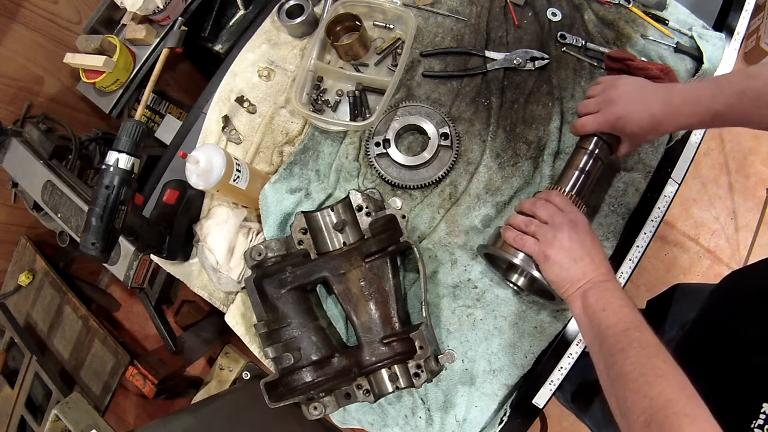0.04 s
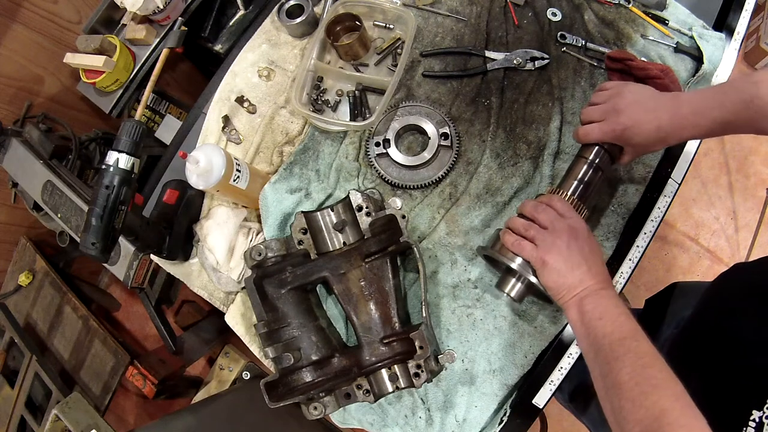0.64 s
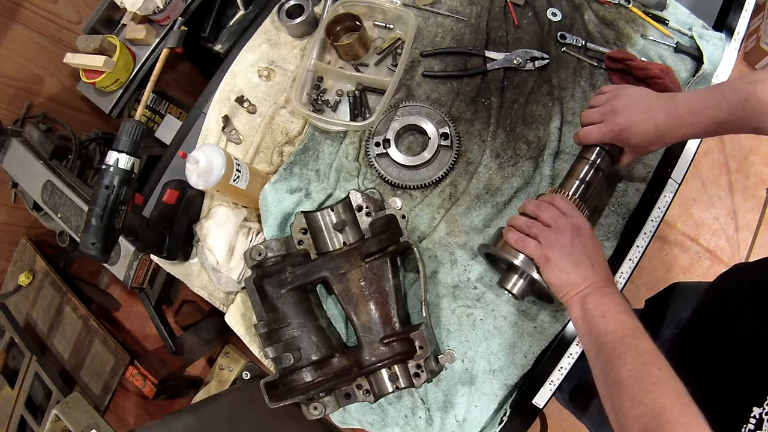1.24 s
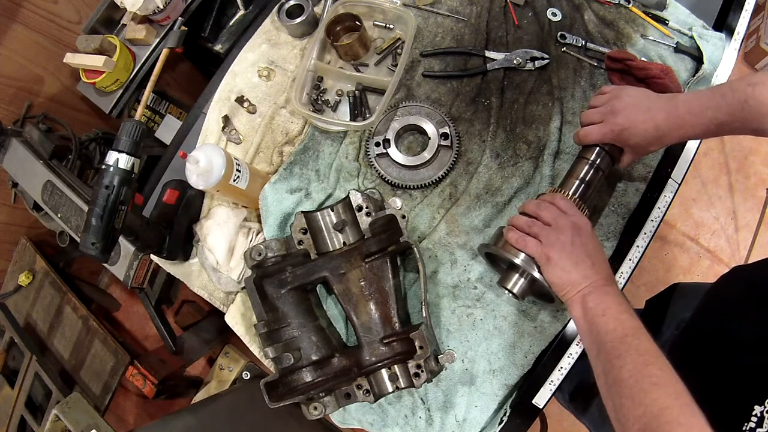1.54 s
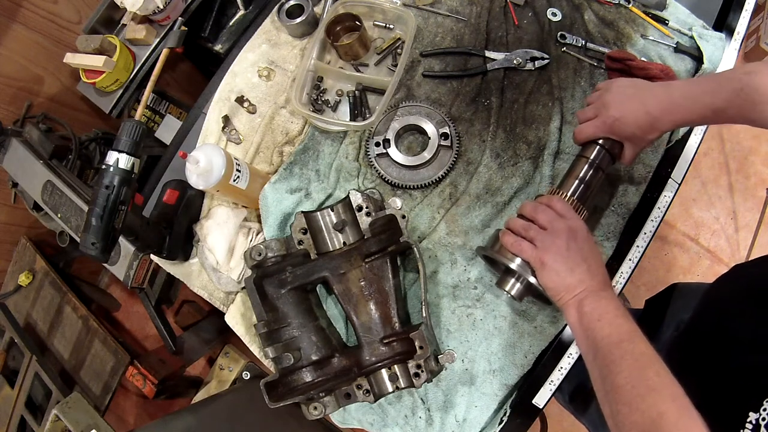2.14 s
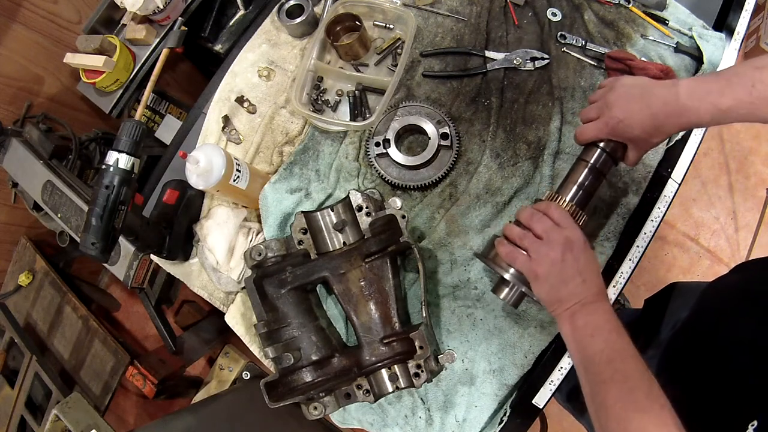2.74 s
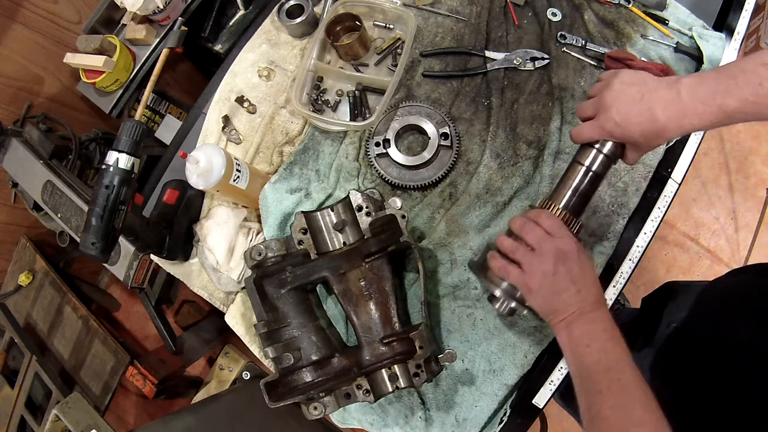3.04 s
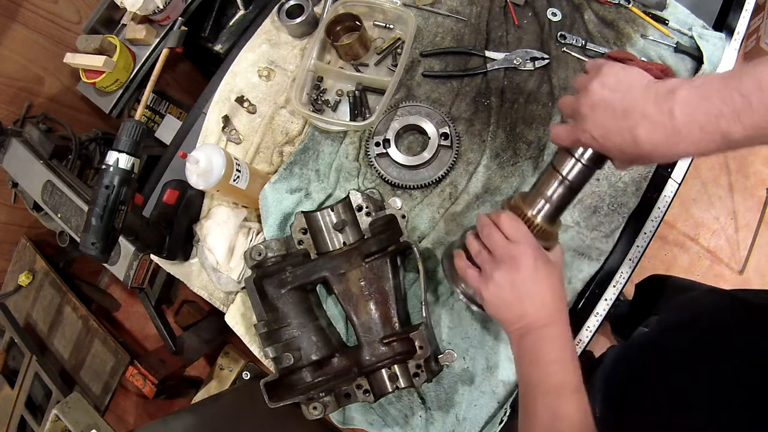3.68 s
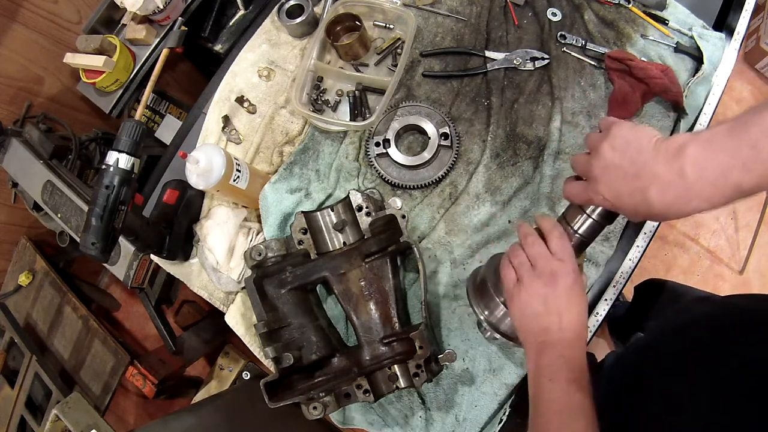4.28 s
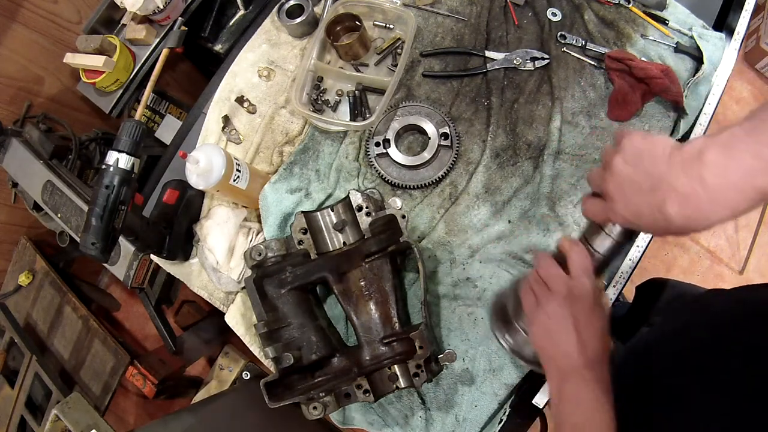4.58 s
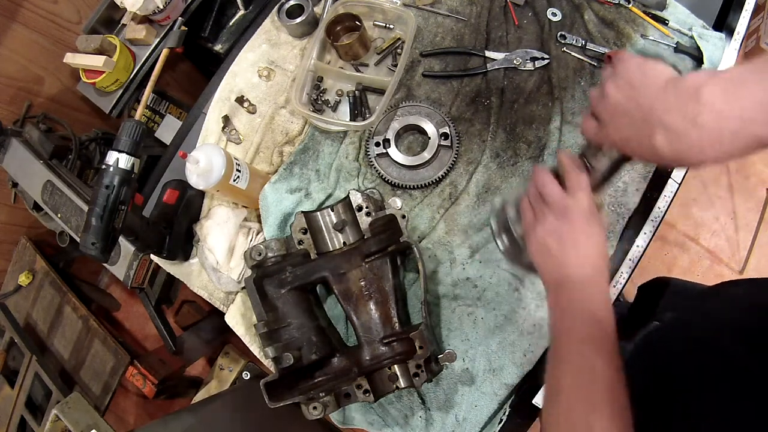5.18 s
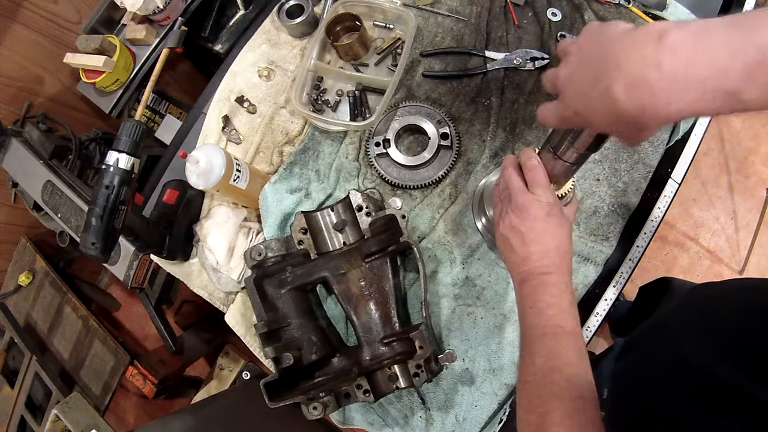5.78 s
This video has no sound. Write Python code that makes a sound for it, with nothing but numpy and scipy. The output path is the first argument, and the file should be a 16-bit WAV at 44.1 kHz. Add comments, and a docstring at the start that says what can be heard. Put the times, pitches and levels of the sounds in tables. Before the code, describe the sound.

A low rumble and faint hiss fill a small workshop throughout. From about 0.3 to 1.2 seconds, a steel shaft knocks dully several times on a cloth-covered workbench as a loose gear is rocked on it, with brief scrapes and the heaviest thump near 0.7 seconds. A small part clinks faintly at 1.3 seconds. More knocks and light metal clicks come between 2.1 and 2.9 seconds. Hands and rag rustle softly, and grit ticks at 3.3 seconds. Near 3.9 seconds the gear slides with a squeaky scrape, then hits a step on the shaft at 4.1 seconds with one loud, bright clank. Smaller scrapes and a light clink follow until about 4.8 seconds. From 5.3 seconds the heavy parts are set down with a scrape and several thumps, then dragged over the bench with a low, fading rumble. Everything sounds close.

```python
"""First comes a low room rumble, then a loose steel gear is rocked and slid along its shaft.
The shaft thumps a cloth-covered workbench, and the gear's hole scrapes and squeaks on the steel.
Hands and rag rustle, grit ticks and a small part clinks. About four seconds in, the gear hits the
shoulder (a step on the shaft) with one bright clank. Last, it is all dragged and set down."""
import sys
import numpy as np
from scipy import signal
from scipy.fft import rfft, irfft
from scipy.io import wavfile

SR = 44100
rng = np.random.default_rng(int(sys.argv[2]) if len(sys.argv) > 2 else 0)


def to_wav(sig):
    """Store sig (one row per channel, or 1-D mono) as 16-bit WAV at the path in sys.argv[1].

    Samples outside -1..1 are clipped; the rate is SR.
    """
    pcm = np.clip(np.atleast_2d(sig), -1, 1) * 32767
    pcm = np.round(pcm).astype(np.int16)
    wavfile.write(sys.argv[1], SR, pcm.T)  # frames by channels


N = 261072


def gain_of(db):
    """Turns decibels into a number to multiply a sound by."""
    return 10 ** (np.asarray(db) / 20)

def evened(x):
    """Scales a sound to an average (rms) level of 1."""
    return x / np.sqrt(np.mean(x ** 2) + 1e-20)

def value_at(rows, hz):
    """Looks up a pitch in rows of (pitch_hz, value), blending between rows."""
    pitches, values = np.transpose(rows)
    return np.interp(np.log(hz + 1), np.log(pitches + 1), values)

def add(mix, start_s, sound):
    """Mixes a sound in at its start time."""
    part = mix[round(start_s * SR):][:len(sound)]
    part += sound[:len(part)]

def coloured(x, colour):
    """Turns each pitch up or down by rows of (pitch_hz, level_db); comes out at level 1."""
    gains = gain_of(value_at(colour, np.fft.rfftfreq(N, 1 / SR)))
    return evened(irfft(rfft(x) * gains, N))

def resonated(x, peaks):
    """Keeps the pitches at which an object likes to ring; comes out at level 1."""
    f = np.fft.rfftfreq(N, 1 / SR)
    response = sum(gain_of(db) / (1 + 1j * (f - hz) / width) ** 2 for hz, width, db in peaks)
    return evened(irfft(rfft(x) * response, N))

def singing(x, pitch_hz, width_hz):
    """Makes noise ring at one gliding pitch; comes out at level 1."""
    turn = np.exp(2j * np.pi * np.cumsum(pitch_hz) / SR)
    decay = np.exp(-np.pi * width_hz / SR)
    return evened((turn * signal.lfilter([1], [1, -2 * decay, decay * decay], x / turn)).real)

def softened(x, cut_hz):
    """Takes the treble off."""
    return signal.sosfilt(signal.butter(2, cut_hz, fs=SR, output="sos"), x)

def friction(per_s, spread_db, hiss):
    """Rubbing is many tiny slips of uneven size over a smooth hiss."""
    slips = (rng.random(N) < per_s / SR) * rng.standard_normal(N)
    sizes = gain_of(spread_db * np.minimum(rng.exponential(1, N), 3))
    return evened(evened(slips * sizes) + hiss * rng.standard_normal(N))

def ring(tones, t):
    """The dying tones of a struck object. Here and below, fade_s is the time to drop 60 dB."""
    return sum(gain_of(db - 60 * t / fade_s) * np.sin(2 * np.pi * hz * t) for hz, db, fade_s in tones)

def bursts(hits, fade_s):
    """A short puff of noise for each (start_s, level_db)."""
    out, t = np.zeros(N), np.arange(4096) / SR
    for start_s, db in hits:
        add(out, start_s, rng.standard_normal(len(t)) * gain_of(db - 60 * t / fade_s))
    return out

# the room's steady noise: pitch_hz, level_db
ROOM_NOISE = [(16, -60), (28, -16.5), (39, -1.5), (49, -37), (87, -21.5), (123, -28.5), (148, -32.5),
              (178, -24), (209, -33.5), (310, -31.5), (404, -39.5), (668, -41.5), (1290, -48),
              (1400, -50.5), (15500, -58)]
# the deep tones of the rumble: pitch_hz, width_hz, level_db
RUMBLE_TONES = [(19.49, 3.14, 7.5), (59.9, 9, -12.5), (126.3, 4.1, -20.5)]
# how the rumble rises and falls: time_s, level_db
RUMBLE_LEVELS = [(0.0, -45), (0.1, -29.5), (2.85, -35), (3.68, -47.5), (3.89, -34.5), (4.6, -27.5),
                 (5.04, -34.5), (5.79, -28), (5.92, -34)]
# the hiss that differs between left and right: pitch_hz, level_db
SIDE_HISS = [(18, -46), (30, -16), (148, -8), (270, 0), (575, -1), (2240, -8), (7460, -4), (15500, -9)]

def background():
    """A low rumble wavers over the room's steady, faint hiss."""
    steady = gain_of(-45.4) * coloured(rng.standard_normal(N), ROOM_NOISE)
    side = gain_of(-68) * coloured(rng.standard_normal(N), SIDE_HISS)
    waver_db = np.interp(np.arange(N) / SR, *np.transpose(RUMBLE_LEVELS))
    rumble = gain_of(waver_db - 1) * resonated(rng.standard_normal(N), RUMBLE_TONES)
    return np.array([steady + rumble + side, steady + rumble - side])

# the tone colour of skin rubbing on rag: pitch_hz, level_db
CLOTH_COLOUR = [(180, -64), (300, -7), (401, -5.5), (427, -4.5), (456, 2), (599, -5), (692, -5.5),
                (1020, -3.5), (1700, -7), (3240, -12), (3750, -15.5), (5970, -16.5), (8100, -26.5),
                (9670, -19.5), (14000, -35)]
# what that rubbing sets ringing: pitch_hz, width_hz, level_db
RASP_TONES = [(990, 390, 1), (1291, 40, 8), (2196, 48, 7), (3240, 250, 6.5)]
# moves of the hands: fastest_s, rise_s, fall_s, level_db
HAND_MOVES = [(0.48, .3, 0.22, -67), (3.27, .27, 0.28, -58.5), (3.76, 0.11, 0.18, -63),
              (4.35, 0.24, 0.18, -65), (5.38, 0.29, 0.28, -56.5), (5.68, 0.11, 0.22, -55.5)]

def rustling(resting_db=-72.5):
    """Skin and rag rustle with each move of the hands, which never lie quite still."""
    cloth = gain_of(3) * coloured(friction(per_s=2500, spread_db=-4, hiss=1), CLOTH_COLOUR)
    rasp = gain_of(-2) * resonated(friction(per_s=1100, spread_db=-2.5, hiss=.296), RASP_TONES)
    power = gain_of(resting_db) ** 2
    for fastest_s, rise_s, fall_s, db in HAND_MOVES:
        t = np.arange(N) / SR - fastest_s
        swell = np.exp(-(t / np.where(t < 0, rise_s, fall_s)) ** 2)
        power += (gain_of(db) * swell) ** 2
    return np.sqrt(power) * (cloth + rasp)

# the gear's scrape, its high squeak and the bench's shake: pitch_hz, width_hz, level_db
SCRAPE_TONES = [(1430, 150, -4), (1670, 70, -6), (2012, 30, 3), (2330, 260, -1), (3250, 300, -15),
                (4650, 400, -14), (5150, 400, -10), (6200, 300, -18)]
SQUEAK_TONES = [(9800, 85, 0), (10300, 300, -25), (10400, 410, -11.5)]
SHAKE_TONES = [(199, 30.6, -1.5), (338.6, 20, 2.5), (640, 100, 0), (860, 73, -3), (1022, 430, -7)]
# slides of the gear: start_s, push_s, hold_s, swell_db, scrape_db, squeak_db, shake_db,
# pitch_hz (of its hole at full pressure), sing_db (how clearly that pitch stands out of the scrape)
SLIDES = [(0.24, 0.033, .015, 3.5, -73, -84, -58, 2140, 7), (0.44, .15, .05, 9, -62, -70, -52, 2120, 7.5),
          (0.635, .025, .008, 8, -53, -64, -38, 2220, -2),
          (1.77, 0.022, 0.062, 8, -72.5, -83, -61.5, 2190, 8),
          (2.41, 0.064, .01, 9, -67.5, -68, -50.5, 2130, 0),
          (3.913, 0.085, .095, 21, -44.5, -56.5, -40, 2264, -2),
          (4.357, 0.083, 0.014, 14, -49, -60.5, -76, 2240, -3.5),
          (4.709, 0.034, 0.043, 16, -55, -61.5, -78, 2370, -6),
          (5.333, .07, .025, 7, -45, -57, -48, 2266, -8), (5.426, .006, .006, 6, -47, -74, -45, 2230, 11)]

def sliding(grip_s=.011, release_db_per_s=382, rise_hz_per_db=6.5):
    """Tiny slips make the gear sing and the bench shake; pressing harder raises level and pitch."""
    slips = friction(per_s=1400, spread_db=1.5, hiss=.75)
    scrape, squeak, shake = (resonated(slips, p) for p in (SCRAPE_TONES, SQUEAK_TONES, SHAKE_TONES))
    out = np.zeros(N)
    for start_s, push_s, hold_s, swell_db, scrape_db, squeak_db, shake_db, pitch_hz, sing_db in SLIDES:
        span = slice(round(start_s * SR), round(start_s * SR) + SR // 2)
        t = np.arange(len(out[span])) / SR
        # the hand's pressure builds, holds and lets go
        press_db = -swell_db * np.maximum(1 - t / push_s, 0)
        press_db -= release_db_per_s * np.maximum(t - push_s - hold_s, 0)
        note = singing(slips[span], pitch_hz + rise_hz_per_db * np.maximum(press_db, -30), width_hz=120)
        steel = gain_of(scrape_db) * (gain_of(sing_db - 2) * note + gain_of(-1) * scrape[span])
        steel += gain_of(squeak_db - 3) * squeak[span]
        bench = gain_of(shake_db - 3 + 1.14 * press_db) * shake[span]
        add(out, start_s, np.minimum(t / grip_s, 1) * (gain_of(press_db) * steel + bench))
    return out

# knocks of the shaft: start_s, thud_db, boom_db, hardness_db (steel ring compared with thud),
# ring_factor (a loose grip lets the steel ring longer), bounce_db
KNOCKS = [(0.259, -35, -35.5, -23, 1, -12), (0.285, -43, -38, -8, .4, -15),
          (0.488, -31.5, -28, -31, .65, -7), (0.621, -30.5, -33.5, -26, 1, -15),
          (0.6658, -17.5, -23, -8, .15, -3), (0.848, -30, -54, -25, .9, -4),
          (1.167, -25.5, -31, -26, .8, -12), (2.146, -46, -38, -32, .9, -12),
          (2.3811, -30.5, -41, -14.5, 2, -14), (2.419, -38, -58, -9, 1.1, -14),
          (2.465, -31, -36, -22, .8, -3), (2.6501, -22, -29, -21, .46, -9),
          (2.856, -36, -37.5, -16, .15, -7), (4.1109, -25.5, -18.5, 15.5, 0.92, -18),
          (4.343, -46.5, -46, 2, .15, -12), (4.431, -51.5, -55, 15.5, 1.06, -15),
          (5.338, -25.5, -17.5, -14, .8, -15), (5.361, -19.5, -63, -38, .9, -16),
          (5.447, -26, -33, -13, .4, -9), (5.6, -31, -36, -16, .15, -12)]
# the tones of the struck bench: pitch_hz, level_db, fade_s
BENCH_TONES = [(53.5, -11.5, 0.89), (89.2, -14.5, 0.69), (132.3, 7.5, 0.098), (175.8, -4.5, 0.26),
               (191, 1, 0.17), (224.7, -1.5, 0.25), (270.3, 3, 0.11), (330.1, -4, 0.24), (353, -11, 0.14),
               (464.7, -4.5, 0.059), (540, -12.5, 0.17), (597.6, -4, 0.17), (741, 4.5, 0.026),
               (852, -12.5, 0.16), (1043, -12, 0.09), (1127, -17, 0.077), (1439, -13, 0.067)]
# echoes from nearby walls: delay_s, level_db
WALL_ECHOES = [(0.0189, -12.5), (0.0372, -16)]

def thumps(bounce_s=.0215, detune=.012):
    """The shaft hits the bench through the rag and rocks back once; the walls echo the thump."""
    out, t = np.zeros(N), np.arange(SR // 2) / SR
    # the weight of the hands shifts the bench's pitches a little from knock to knock
    tunings = 1 + detune * rng.standard_normal((len(KNOCKS), len(BENCH_TONES)))
    for (start_s, thud_db, boom_db, hardness_db, _, bounce_db), tuning in zip(KNOCKS, tunings):
        cushion_s = .0018 + .00002 * max(-hardness_db, 0)  # the rag cushions soft blows longer
        onset = 1 - np.exp(-(t / cushion_s) ** 2)
        clack_db = thud_db + .52 * hardness_db  # hard knocks reach the higher tones
        blow = [(140, boom_db - 2), (200, thud_db - 2), (370, thud_db - 4), (640, clack_db - 3)]
        tones = [(hz * shift, db + value_at(blow, hz), fade_s)
                 for (hz, db, fade_s), shift in zip(BENCH_TONES, tuning)]
        thump = onset * ring(tones, t)
        add(out, start_s, thump)
        add(out, start_s + bounce_s, gain_of(bounce_db) * softened(thump, cut_hz=350))
    muffled = softened(out, cut_hz=770)
    for delay_s, db in WALL_ECHOES:
        add(out, delay_s, gain_of(db) * muffled)
    return out

# the tones of gear and shaft held in a hand: pitch_hz, level_db, fade_s (before ring_factor)
STEEL_TONES = [(1636, -17, 0.083), (1940, -12, 0.12), (1998, -14.5, 0.13), (2035, -16, 0.25),
               (2056, 3, 0.05), (2139, -10, 0.089), (2340, -27, 0.13), (2950, -37, 0.071),
               (3040, -38.5, 0.076), (7700, -56, 0.69), (9780, -33.5, 0.19)]

def clanks(crack_hz=680, rise_s=.0026):
    """Steel meets steel at each knock: a short crack, then the gear rings."""
    out, t = np.zeros(N), np.arange(SR // 2) / SR
    phase = np.pi * (crack_hz * t - .75)
    crack = (1 - 2 * phase ** 2) * np.exp(-phase ** 2)  # one push with a dip on each side
    crack *= np.minimum(t * SR / 16, 1)
    onset = 1 - np.exp(-t / rise_s)
    for start_s, thud_db, _, hardness_db, ring_factor, _ in KNOCKS:
        metal = onset * ring([(hz, db, fade_s * ring_factor) for hz, db, fade_s in STEEL_TONES], t)
        add(out, start_s, gain_of(thud_db + hardness_db) * (gain_of(1) * metal + gain_of(4) * crack))
    return out

# the bright splash of steel on steel: pitch_hz, width_hz, level_db
CHATTER_TONES = [(3030, 430, -1), (4530, 480, 0)]

def chatter():
    """Steel faces rattle for an instant at each knock, loudest where the knock is hardest."""
    hits = [(start_s, thud_db + hardness_db) for start_s, thud_db, _, hardness_db, *_ in KNOCKS]
    return gain_of(-65) * resonated(bursts(hits, fade_s=.069), CHATTER_TONES)

# tiny ticks of grit and metal: start_s, level_db, pitch_hz, width_octaves
GRIT_TICKS = [(1.2235, -52, 9750, .25), (3.303, -40.5, 2600, 0.52), (3.316, -51.5, 9000, .4),
              (3.319, -46, 3300, 0.82)]

def ticks():
    """Each hard, light touch gives an instant of bright noise around one pitch."""
    out, f = np.zeros(N), np.fft.rfftfreq(N, 1 / SR) + 1
    for start_s, db, pitch_hz, width_octaves in GRIT_TICKS:
        band = evened(np.exp(-(np.log2(f / pitch_hz) / width_octaves) ** 2))
        out += irfft(rfft(bursts([(start_s, db)], fade_s=.017)) * band, N)
    return out

# the hits of a small loose part: start_s, level_db
CLINK_HITS = [(1.292, 0), (1.2985, -9)]
# the tones it rings with: pitch_hz, width_hz, level_db
CLINK_TONES = [(3250, 170, -4), (4640, 400, -4), (5250, 330, 5), (6100, 180, -13)]

def clinks():
    """A small loose part strikes, bounces once and rings briefly."""
    return gain_of(-71) * resonated(bursts(CLINK_HITS, fade_s=.016), CLINK_TONES)

# what dragging sets ringing in the bench: pitch_hz, width_hz, level_db
DRAG_TONES = [(48, 18, 2.5), (74.4, 4.2, 5), (144.7, 8.9, 1), (206, 35, -7.5), (363.5, 22.6, -9.5),
              (535, 350, -33.5)]

def dragging(start_s=5.43, rise_s=.024, fade_db_per_s=54.5):
    """The heavy gear and shaft rumble as they are pushed over the bench, fading as they slow."""
    t = np.maximum(np.arange(N) / SR - start_s, 0)
    level = np.minimum(t / rise_s, 1) * gain_of(-21 - fade_db_per_s * t)
    return level * resonated(friction(per_s=170, spread_db=3.5, hiss=.76), DRAG_TONES)

# how long sound lingers in the room: pitch_hz, fade_s
ROOM_FADES = [(100, 1), (300, 0.52), (1000, 0.31), (2200, 0.33), (5000, 0.24), (10000, 0.18)]

def workshop(x, echo_db, first_s=.0068, echoes_per_s=2500):
    """Adds many small echoes from bench, tools and walls; low pitches linger longest."""
    echoes = rng.choice([-1., 1.], SR) * (rng.random(SR) < echoes_per_s / SR)
    echoes *= np.arange(SR) / SR > first_s
    hz, t, bands = signal.stft(echoes, SR, nperseg=256)
    fade = gain_of(-60 * t / value_at(ROOM_FADES, hz)[:, None])
    _, tail = signal.istft(bands * fade, SR, nperseg=256)
    return x + gain_of(echo_db) * signal.fftconvolve(x, tail / np.linalg.norm(tail))[:N]

def scene():
    """Mixes the sounds, with everything on the bench midway between left and right."""
    bench = workshop(thumps(), echo_db=-10)
    clicks = workshop(clinks() + chatter(), echo_db=-2) + workshop(ticks(), echo_db=-6)
    gear = workshop(clanks(), echo_db=-9) + workshop(sliding(), echo_db=-7.5)
    return background() + bench + clicks + gear + rustling() + dragging()

def record(dry):
    """Cuts off the very highest treble."""
    cut_hz = 15750
    low_pass = signal.firwin(511, cut_hz, window=("kaiser", 9), fs=SR)
    return signal.oaconvolve(dry, low_pass[None], "same")

dry = scene()
out = record(dry)
to_wav(out)
```